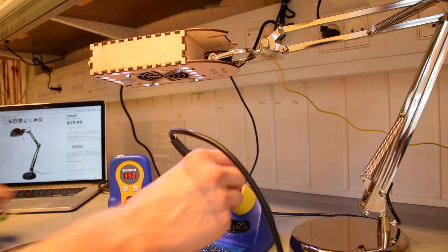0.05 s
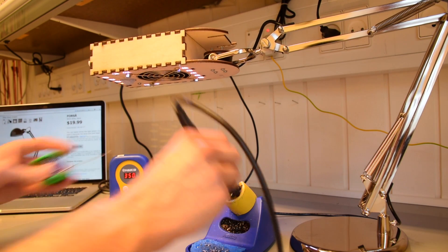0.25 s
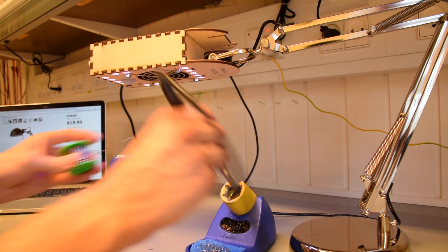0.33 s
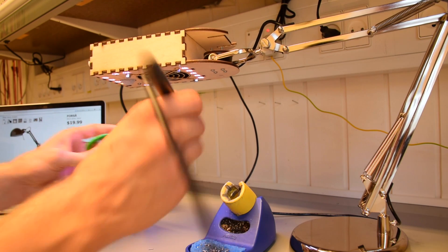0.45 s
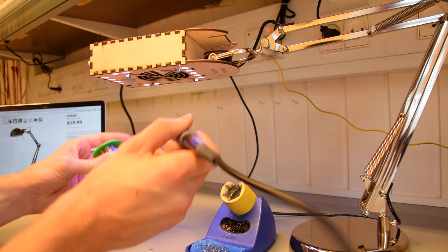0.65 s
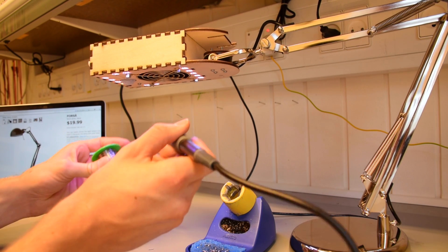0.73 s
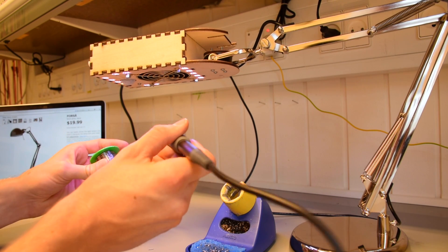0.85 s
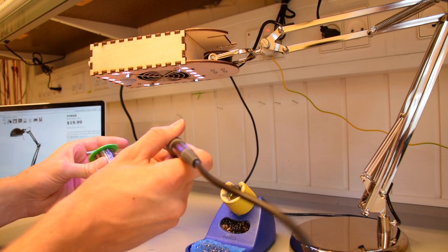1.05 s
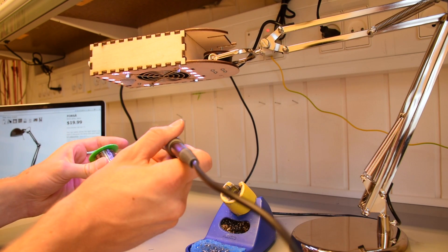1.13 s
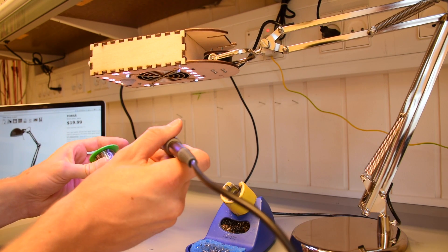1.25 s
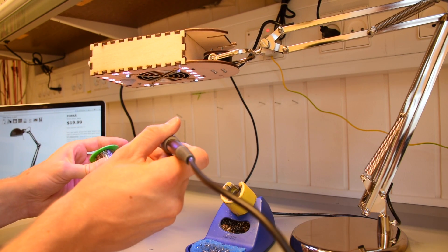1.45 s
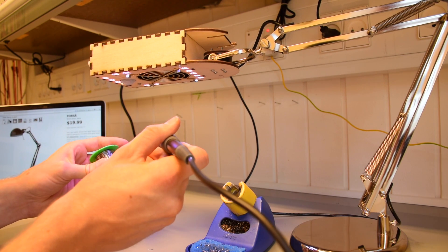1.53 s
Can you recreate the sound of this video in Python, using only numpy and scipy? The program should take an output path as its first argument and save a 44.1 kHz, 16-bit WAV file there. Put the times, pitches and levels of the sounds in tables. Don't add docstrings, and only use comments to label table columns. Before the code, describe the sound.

A hand tool is pulled from its bench stand: light scrapes and knocks, then a loud bright metallic clack with a brief rattle, over a small fan speeding up in a small room, close microphone with faint hiss.

```python
import sys
import numpy as np
from scipy import signal
from scipy.fft import rfft, irfft
from scipy.io import wavfile
from scipy.ndimage import uniform_filter1d

SR = 44100
rng = np.random.default_rng(int(sys.argv[2]) if len(sys.argv) > 2 else 0)


def makeup_ratio(level_db):
    decades = np.asarray(level_db, float) / 20
    return 10 ** decades


def wav_out(sig):
    wavfile.write(sys.argv[1], SR, np.round(np.clip(np.atleast_2d(sig).T, -1, 1) * 32767).astype(np.int16))


N = 70560

# pitch [Hz], level [dB], time to fade by 60 dB [s].
HOLDER = [(690, -11, .16), (1150, -13, .07), (1320, -6, .12), (1390, -7, .2), (1597, 2, .12),
          (1640, -7, .08), (1855, -4, .09), (2050, -9, .18), (2163, -7, .08), (2295, -7, .08),
          (2514, -14, .06), (2630, -10, .09), (3025, -14, .08), (3415, -12, .06)]
# pitch [Hz], level [dB], time to fade by 60 dB [s].
METAL = [(3935, -2, .24), (3975, -5, .22), (5700, -9, .12), (6400, -13, .15), (7120, -4, .3),
         (6900, -8, .15), (7450, -7, .15), (8530, -4, .17), (8590, -6, .13), (8730, -3, .07),
         (9700, -14, .12), (10420, -7, .1), (11530, -8, .15), (14300, -18, .05)]


def add(out, start_s, sound):
    start = int(start_s * SR)
    out[start:start + len(sound)] += sound


def fade(t, t60_s):
    return np.exp(-np.log(1000) * t / t60_s)


def ring(modes, chance):
    spread_db, contact_s = 2.5, 0.00074
    t = np.arange(SR // 2) / SR
    table = np.array(modes)
    hz, db, t60_s = table[:, :1], table[:, 1], table[:, 2:]
    strength = makeup_ratio(db + spread_db * chance[:len(table)])
    start_turn = chance[-len(table):, None]
    waves = fade(t, t60_s) * np.sin(2 * np.pi * (hz * t + start_turn))
    onset = np.sin(np.pi / 2 * np.clip(t / contact_s, 0, 1)) ** 2
    return strength @ waves * onset / np.sqrt(np.sum(makeup_ratio(2 * db)) / 2)


def taps():
    # pitch [Hz], level [dB], time to fade by 60 dB [s].
    tool = [(694, -9, .12), (1150, -2, .08), (1325, -6, .05), (1600, -6, .1), (1660, -1, .04),
            (1900, -6, .05), (2265, -3, .06), (2510, -1, .05), (4830, -19, .05), (6500, -22, .04),
            (8800, -26, .05)]
    tip = [(4300, -2, .1), (5900, -6, .05), (8600, -8, .08), (9500, -4, .04), (11600, -7, .04),
           (2870, -12, .08)]
    cable = [(460, -2, 0.052), (693, 3, 0.12), (1144, 0.5, 0.08), (1880, -10, .05)]
    clack = [(3408, -9, .06), (3946, 3, .06), (4490, -4, .05), (5717, -4, .045), (7133, -6, .05),
             (7650, -8, .055), (8732, -15, .07), (9238, -17, .06), (9711, -19, .06), (10370, -18, .05),
             (13290, -22, .04), (14500, -14, .025)]
    ping = [(3020, -10, 0.07), (7540, -4, .07), (8470, -5, 0.047), (8560, 1.5, .06), (1599, 1.5, 0.073),
            (1338, -5.5, 0.06), (8850, -1, .05), (10400, -9.5, .05), (11620, -12.5, 0.05)]
    # start [s], level [dB].
    clack_taps = [
        (.3655, -17.5),
        (.3705, -13),
    ]
    events = [(.2152, -18.5, tool), (.7332, -38, tip), (.505, -35, cable)]
    events += [(s, db, clack) for s, db in clack_taps]
    events += [(.4115, -14.5, ping), (.367, -22, cable)]
    out = np.zeros(N + SR)
    for s, db, modes in events:
        add(out, s, makeup_ratio(db) * ring(modes, rng.standard_normal(28)))
    return out[:N]


def ticks():
    # start [s], level [dB], width [ms].
    contacts = [(.2105, -25, 0.15), (.2149, -14.5, 0.15), (.2166, -12.5, 0.15), (.2277, -16.5, 0.1),
                (.3715, -5, 0.058), (.3752, -11, 0.05), (.4096, -7, 0.042), (.4135, -8, 0.054),
                (.5021, -22.5, 0.21), (.5063, -23.5, .22), (0.7443, -25.5, 0.082), (0.7635, -28, .1),
                (.733, -31, 0.031)]
    out, t = np.zeros(N + SR), np.arange(128) / SR
    for s, db, width_ms in contacts:
        u = t * 1000 / width_ms - 3
        add(out, s, makeup_ratio(db) * (1 - u ** 2) * np.exp(-u ** 2 / 2))
    return out[:N]


def knocks():
    # pitch [Hz], level [dB], time to fade by 60 dB [s].
    bench = [(194, -6, 0.095), (247, -3, 0.11), (320, -9, .08), (401.4, -3, 0.14), (506, 2.5, 0.034)]
    blow_times = [.125, .150, .182, .2155, .229, .254, .267, .274, .304, .365, .371, .386, .412, .503, .745]
    # holder level [dB], metal level [dB], bench level [dB].
    blows = [(-46.5, -62, -61), (-63, -65, -47), (-44, -60, -42), (-37.5, -70, -33.5), (-45, -60, -35),
             (-33, -51, -44), (-50, -53, -39.5), (-55, -54, -47), (-64, -62, -46), (-12, -46, -37),
             (-17.5, -42, -29.5), (-22.5, -35, -30.5), (-17.5, -30.5, -29), (-61, -53, -39.5),
             (-42, -60, -43)]
    out = np.zeros(N + SR)
    for s, (holder_db, metal_db, bench_db) in zip(blow_times, blows):
        chance = rng.standard_normal((3, 28))
        add(out, s, makeup_ratio(holder_db) * ring(HOLDER, chance[0]))
        add(out, s, makeup_ratio(metal_db) * ring(METAL, chance[1]))
        add(out, s, makeup_ratio(bench_db) * ring(bench, chance[2]))
    return out[:N]


def rattles():
    rattle_times = [.125, .13, .176, .2105, .2145, .228, .228, .243, .24, .273, .273, .3645, .366, .366,
                    .378, .378, .409, .409, .424, .424, .5025, .733, .733, .7445, .7635, .4305, .467, .517,
                    .3705, .24, .378, .285, .3655, .504, .211, .216]
    # length [s], centre pitch [Hz], width [octaves], level [dB].
    bursts = [(0.01, 4100, 1.1, -41.5), (0.24, 284, 1.15, -45.5), (0.033, 610, 2.1, -40),
              (0.007, 4300, 1.5, -32), (0.0097, 1770, 1.5, -25.5), (0.0081, 10000, 2, -38),
              (0.0041, 970, 1.1, -29), (0.019, 880, 1.3, -40), (0.058, 222, 1.02, -34),
              (.007, 7200, 0.47, -39.5), (0.0083, 1420, 1.8, -30.5), (0.0063, 1370, 2.3, -7.5),
              (0.012, 3840, 2.03, -18.5), (.006, 14400, 0.35, -31), (0.04, 1160, 1.9, -25),
              (0.023, 6900, 0.79, -27.5), (0.008, 8500, 2, -18.5), (0.013, 1820, 2.84, -14),
              (0.098, 5300, 1.63, -37), (0.039, 2000, 4.1, -29.5), (0.021, 940, 1.9, -36),
              (0.012, 4900, 0.73, -39.5), (0.0063, 11000, 1.3, -41), (0.012, 690, 3.5, -38),
              (0.012, 1500, 3.4, -38), (0.0052, 7700, .3, -33), (.008, 7600, .3, -35),
              (.006, 1000, 1.3, -35), (0.0073, 9100, 1.2, -27), (0.035, 4800, 0.48, -46),
              (0.027, 14000, 0.79, -41), (.03, 480, 1.2, -52.5), (0.02, 4560, 1.1, -17.5),
              (.012, 3100, .8, -43), (0.006, 1440, 1.2, -29.5), (.012, 5200, 0.82, -38.5)]
    grit_power, sag, t60_s, rise_s = 1, 1.34, 0.028, 0.0011
    comb_db, comb_width = 11, .05
    size = 8192
    out, t = np.zeros(N + SR), np.arange(size) / SR
    f = np.maximum(np.fft.rfftfreq(size, 1 / SR), 1)
    comb = np.ones_like(f)
    for hz, db, _ in HOLDER + METAL:
        comb += makeup_ratio(comb_db + db / 2) / (1 + (2 * (f / hz - 1) / comb_width) ** 2)
    for s, (length_s, hz, octaves, db) in zip(rattle_times, bursts):
        noise, roughness = rng.standard_normal((2, size))
        colour = comb * np.exp(-(2 * np.log2(f / hz) / octaves) ** 2)
        grit = irfft(rfft(noise * np.abs(roughness) ** grit_power) * colour)
        rubbing = np.exp(-sag * np.minimum(t, length_s) / length_s)
        shape = np.clip(t / rise_s, 0, 1) * rubbing * fade(np.maximum(t - length_s, 0), t60_s)
        burst = shape * grit
        add(out, s, makeup_ratio(db) * burst * np.sqrt(np.sum(shape ** 2) / np.sum(burst ** 2)))
    return out[:N]


def thuds():
    # start [s], level [dB].
    booms = [
        (.18, -37),
        (0.249, -32.5),
        (0.289, -43),
        (0.374, -34.5),
        (.505, -44.5),
        (.725, -48.5),
    ]
    hz, rise_s, t60_s = 104.6, 0.016, 0.22
    t = np.arange(N) / SR
    swell = np.zeros(N)
    for s, db in booms:
        since = np.maximum(t - s, 0)
        swell += makeup_ratio(db) * (1 - np.exp(-since / rise_s)) * fade(since, t60_s)
    return 2 * swell * np.sin(2 * np.pi * hz * t)


def level(x, db):
    return x * makeup_ratio(db) / np.sqrt(np.mean(x ** 2))


def walk(rate):
    k = int(SR / rate)
    held = np.repeat(rng.standard_normal(N // k + 1), k)
    return 0.96 * uniform_filter1d(uniform_filter1d(held, k), k)[:N]


def box(f):
    # centre pitch [Hz], width [Hz], boost [dB].
    resonances = [(1370, 120, 3.5), (2190, 50, 2.5), (2700, 930, 6)]
    gains = [1 + (makeup_ratio(db) - 1) / (1 + (2 * (f - hz) / width) ** 2) for hz, width, db in resonances]
    return np.prod(gains, axis=0)


def shaped(points, housing=np.ones_like):
    flicker_db, steady_hz = 0.54, 2530
    f = np.maximum(np.fft.rfftfreq(N, 1 / SR), 1)
    hz, db = np.transpose(points)
    colour = makeup_ratio(np.interp(np.log(f), np.log(hz), db)) * housing(f)
    spectrum = rfft(rng.standard_normal(N)) * colour
    place = 2 * np.log2(f / 20)
    out = np.zeros(N)
    for k in range(21):
        band = irfft(spectrum * np.clip(1 - abs(place - k), 0, 1), N)
        band_hz = 20 * 2 ** (k / 2)
        out += band * makeup_ratio(flicker_db * walk(12.5) / (1 + (band_hz / steady_hz) ** 2))
    return out


def fan():
    # multiple of the motor's switching rate, level [dB].
    whine = [(7, -11), (8, -10.5), (9, -22), (10, -0.9), (11, -2.5), (11.5, -13), (12, -1.5), (13, -26),
             (14, -15), (14.5, -18), (15, -8), (16, -3), (16.5, -10.5), (17, -30), (18, -25), (19, -17),
             (19.5, -19), (20, -8), (20.5, -10.5), (21, -7.5), (21.5, -14), (22, -12), (23, -23), (24, -21),
             (26, -17)]
    # pitch [Hz], level [dB].
    hum_lines = [(60, -67.5), (102, -66)]
    # pitch [Hz], level [dB per Hz].
    air_colour = [(15, -35), (25, -4.5), (117, -2), (734, -7), (1265, -2.5), (1345, -7), (2110, -10.5),
                  (2280, -15.5), (16000, -16.5)]
    full_hz, lag_hz, spin_up_s = 130.5, 12.2, .4
    whine_db, start_db, sharpness = -53, -5, 2.6
    flicker_db, wander = 1.0, .0003
    air_db, chop = -47, 0.1
    t = np.arange(N) / SR
    short = np.exp(-t / spin_up_s)
    hz = full_hz - lag_hz * short
    phase = 2 * np.pi * np.cumsum(hz * (1 + wander * walk(13.6))) / SR
    lines = np.zeros(N)
    for k, db in whine:
        boost = (box(k * hz) / box(k * full_hz)) ** sharpness
        tone = np.sin(k * phase + 2 * np.pi * rng.random())
        lines += makeup_ratio(db + flicker_db * walk(15.7)) * boost * tone
    hum = sum(makeup_ratio(db + 1.6 * walk(10.5)) * np.sin(2 * np.pi * f * t) for f, db in hum_lines)
    air = level(shaped(air_colour, box), air_db) * (1 + chop * np.sin(phase))
    return np.sqrt(2) * (makeup_ratio(whine_db + start_db * short) * lines + hum) + air


def room(x):
    t60_s, dull_hz, rise_s = 0.29, 6140, 0.02
    t = np.arange(SR // 2) / SR
    tail = rng.standard_normal(len(t)) * fade(t, t60_s) * np.clip(t / rise_s, 0, 1)
    tail = signal.lfilter(*signal.butter(1, dull_hz, fs=SR), tail)
    return signal.fftconvolve(x, tail / np.sqrt(np.sum(tail ** 2)))[:N]


def side_hiss():
    # pitch [Hz], level [dB per Hz].
    hiss_colour = [(15, -22), (25, -1.5), (936, -7), (1160, -11), (1400, -39), (1610, -8.5), (2160, -9),
                   (3250, -6.5), (16000, -8.5)]
    return level(shaped(hiss_colour), -56.5)


def scene():
    hits = knocks() + rattles() + taps() + ticks()
    mid = fan() + thuds() + hits + makeup_ratio(-16.5) * room(hits)
    side = side_hiss() + makeup_ratio(-56) * room(np.diff(hits, prepend=0))
    return np.array([mid + side, mid - side])


def low_pass(x):
    return signal.sosfilt(signal.butter(12, 16950, fs=SR, output="sos"), x)


def record(dry):
    low_hz, top_hz = 45, 15860
    bass_cut = signal.butter(1, low_hz, "high", fs=SR, output="sos")
    rounded = np.tanh(0.88 * signal.sosfilt(bass_cut, dry)) / 0.91
    heard = np.fft.rfftfreq(N, 1 / SR) < top_hz
    return low_pass(irfft(rfft(rounded) * heard, N))


dry = scene()
out = record(dry)
wav_out(out)
```